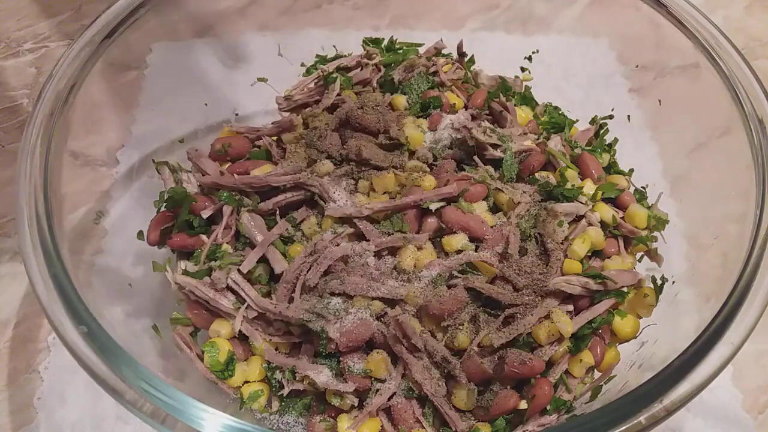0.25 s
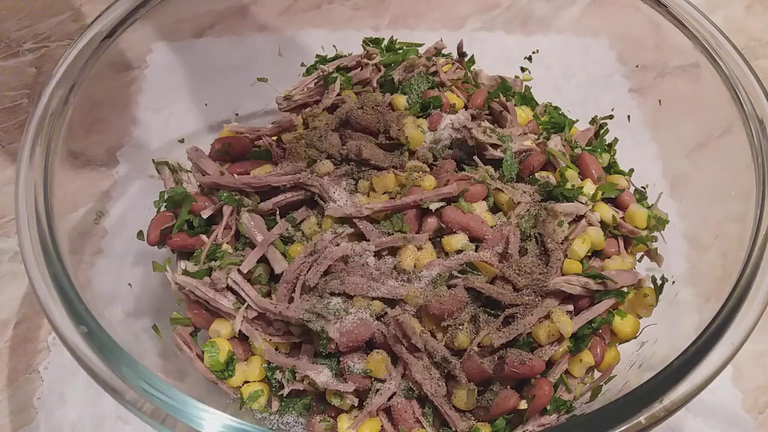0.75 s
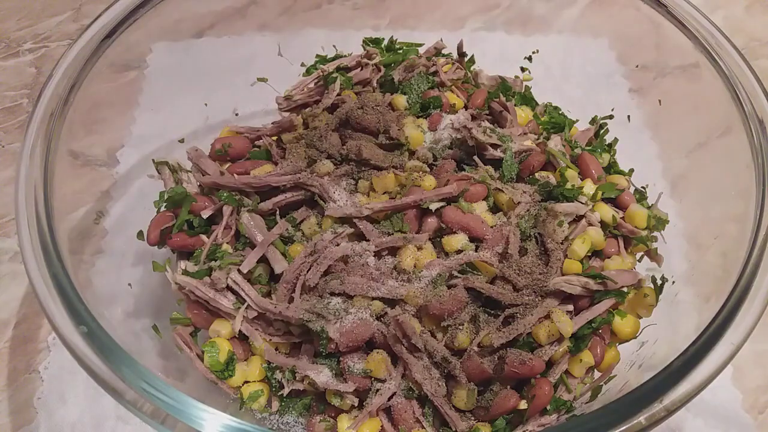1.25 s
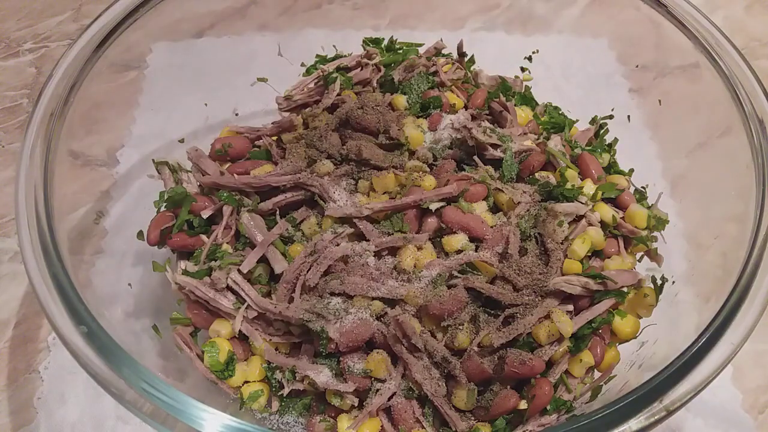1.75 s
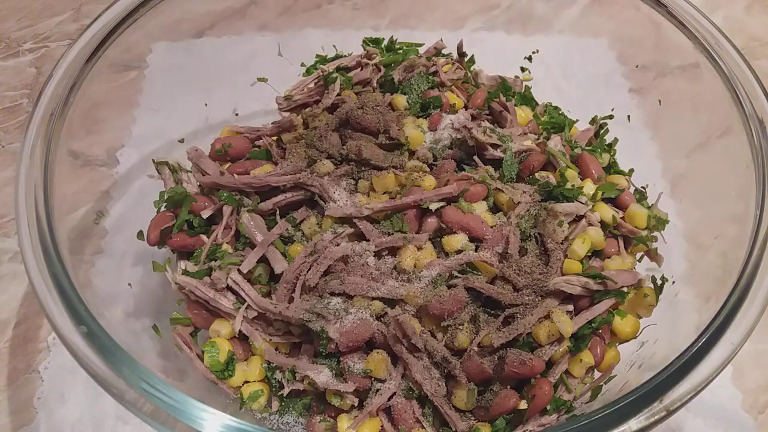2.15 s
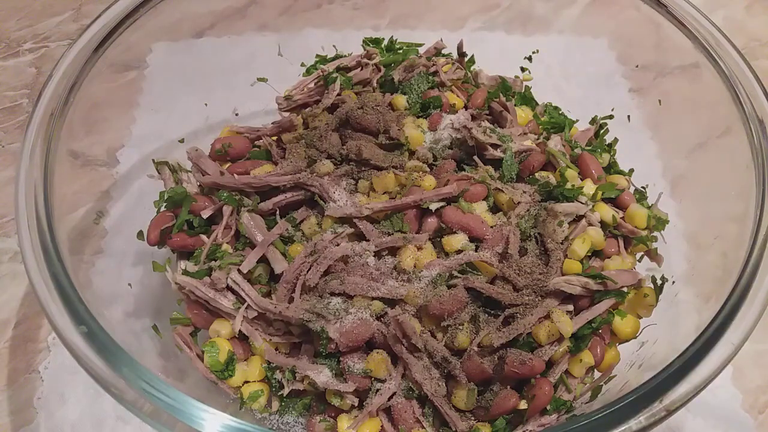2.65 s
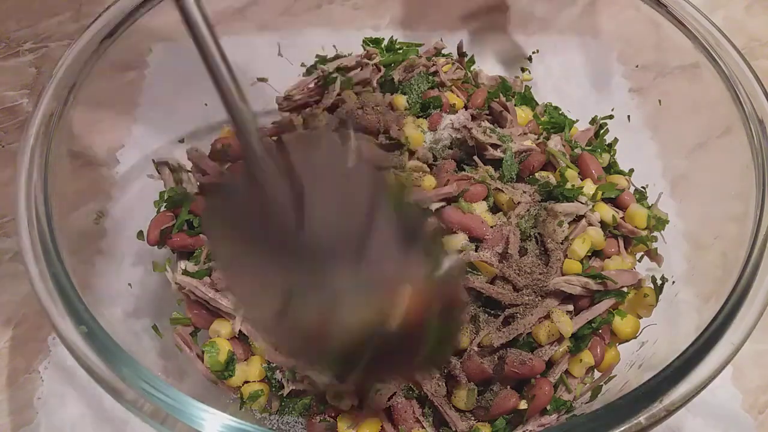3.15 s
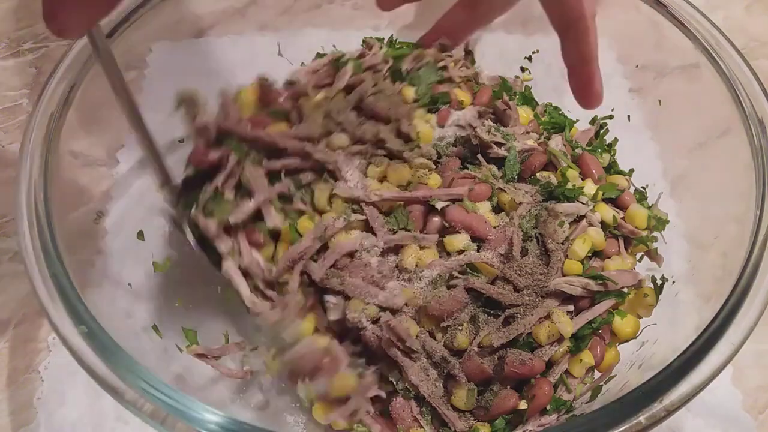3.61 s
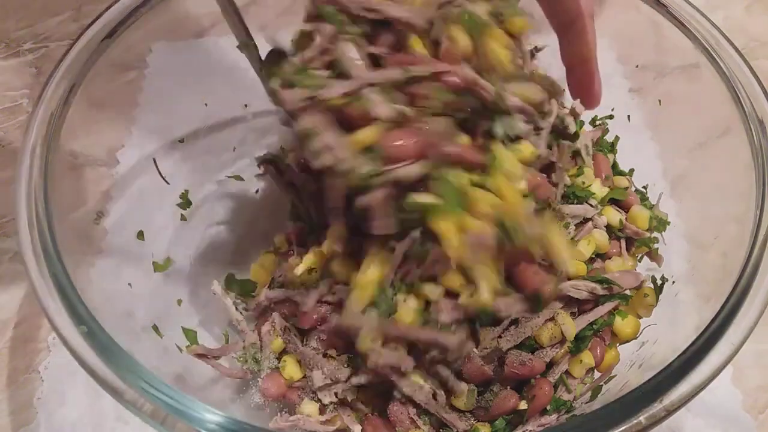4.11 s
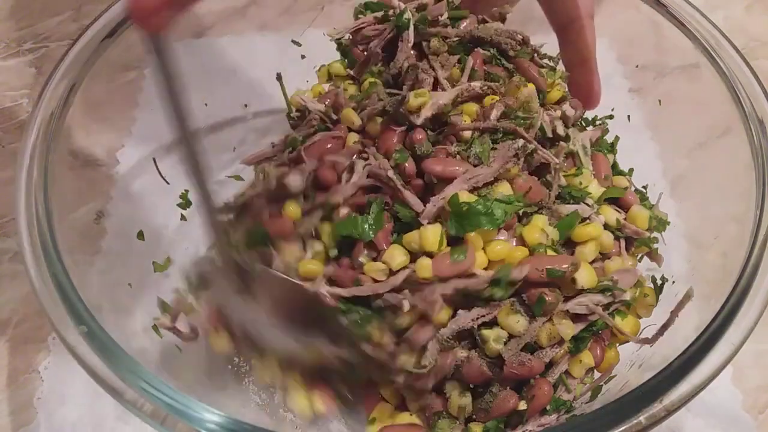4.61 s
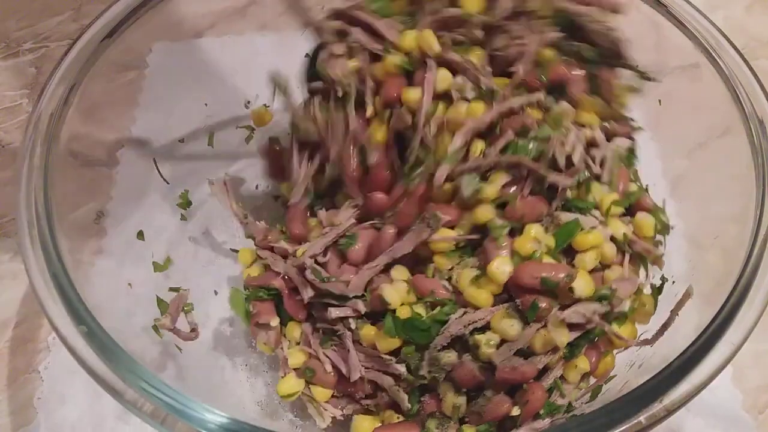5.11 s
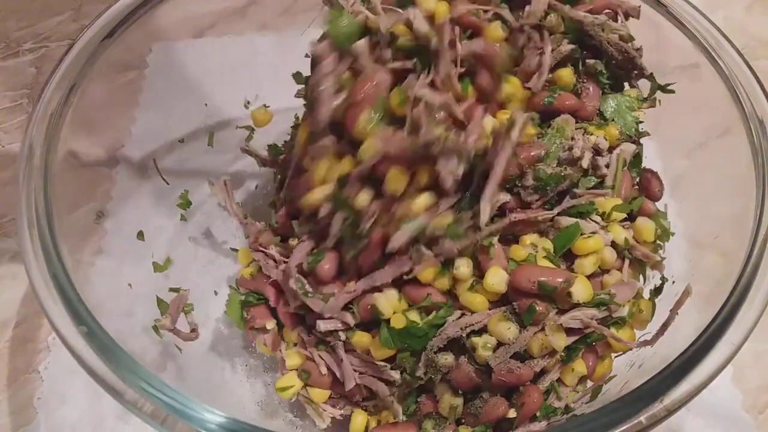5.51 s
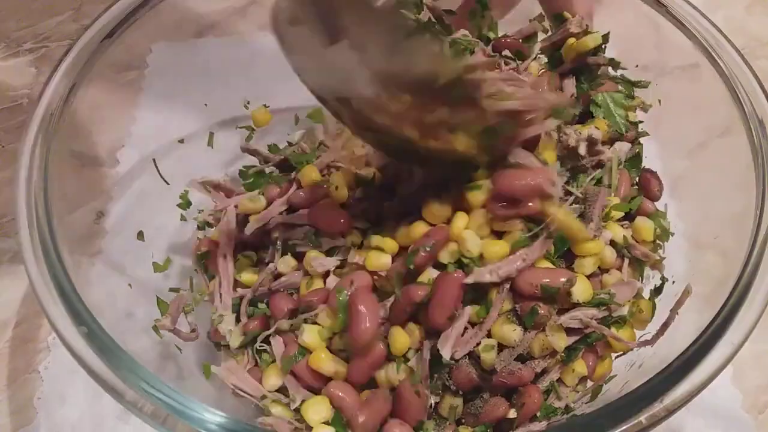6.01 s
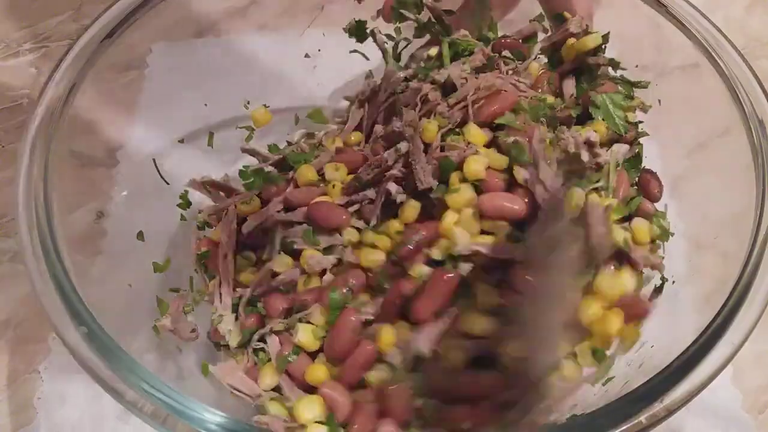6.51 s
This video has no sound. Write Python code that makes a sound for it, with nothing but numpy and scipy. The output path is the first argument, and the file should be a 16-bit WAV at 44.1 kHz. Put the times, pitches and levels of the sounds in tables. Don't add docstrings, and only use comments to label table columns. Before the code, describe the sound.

In a quiet kitchen a lid knocks, cutlery clatters and a cupboard thumps, then a spoon clinks a glass bowl and softly stirs salad.

```python
import sys
import numpy as np
from scipy import signal
from scipy.fft import rfft, irfft, next_fast_len
from scipy.io import wavfile
from scipy.ndimage import uniform_filter1d, map_coordinates

SR = 44100
rng = np.random.default_rng(int(sys.argv[2]) if len(sys.argv) > 2 else 0)


def file_out(sig):
    cols = np.atleast_2d(sig).T
    lim = np.clip(cols, -1, 1)
    pcm = np.round(lim * 32767).astype(np.int16)
    wavfile.write(sys.argv[1], SR, pcm)


def volts(x):
    e = np.asarray(x, float) / 20
    return 10 ** e


N = 298116
TIME = np.arange(N) / SR


def unit(x):
    return x / np.sqrt(np.mean(x ** 2) + 1e-20)


def along(points, hz):
    f, v = np.transpose(points)
    return np.interp(np.log(hz + 1), np.log(f + 1), v)


def wobble(count, size=N):
    knots = rng.standard_normal(size * count // SR + 4)
    return map_coordinates(knots, [TIME[:size] * count])


def swell(s, width, db):
    return db * np.exp(-((TIME - s) / width) ** 2 / 2)


def coloured(x, response):
    return irfft(rfft(x) * response(np.fft.rfftfreq(len(x), 1 / SR)), len(x))


def passed(x, hz, kind):
    return signal.sosfilt(signal.butter(3, min(hz, 20000), kind, fs=SR, output="sos"), x)


def noise(spectrum, count=N):
    m = next_fast_len(count + 8192)
    shape = volts(along(spectrum, np.fft.rfftfreq(m, 1 / SR)))
    return unit(irfft(rfft(rng.standard_normal(m)) * shape, m)[:count])


def patchy(x, depth_db):
    z = signal.stft(x, nperseg=256)[2]
    field = uniform_filter1d(rng.standard_normal(z.shape), size=5, axis=0)
    field = uniform_filter1d(field, size=6, axis=1)
    return unit(signal.istft(z * volts(depth_db * unit(field)), nperseg=256)[1][:len(x)])


def add(track, s, sound):
    part = track[round(s * SR):][:len(sound)]
    part += sound[:len(part)]


# (time nearest [s], audible either side [s], rise of the rumble [dB])
PASSES = [
    (1.48, .3, 8),
    (2.6, .1, 2),
    (5.3, .4, 1.5),
]


def passing_db():
    return sum(swell(*row) for row in PASSES)


# (frequency [Hz], density [dB per Hz])
TRAFFIC_COLOUR = [(15, -54), (25, -24), (33, -27), (45, -14), (57, -7), (86, -3), (150, -1), (200, -8),
                  (260, -38), (440, -120)]


def traffic():
    return volts(-67.5 + passing_db() + .8 * wobble(count=7)) * noise(TRAFFIC_COLOUR)


# (frequency [Hz], density [dB per Hz])
HUM_COLOUR = [(120, -30), (180, -4), (220, -1), (330, -2), (420, -6), (580, -30)]
# (frequency [Hz], width [Hz], level [dB])
ROOM_TONES = [(56, 8, -2), (100, 12, -3), (146, 12, -3), (215, 14, 0), (320, 25, -3)]
# (time [s], either side [s], rise of the hum [dB])
ROCKING = (3.75, .3, 3.5)


def room_hum():
    shaken_db = .6 * passing_db()
    hum = volts(-66.5 + shaken_db + swell(*ROCKING) + .8 * wobble(count=12)) * noise(HUM_COLOUR)

    def resonances(f):
        return sum(volts(db) * w / np.hypot(2 * (f - hz), w) ** 2 * w for hz, w, db in ROOM_TONES)

    tones = coloured(rng.standard_normal(N), resonances)
    return hum + volts(-72 + shaken_db) * unit(tones)


# (frequency [Hz], density [dB per Hz])
AIR_COLOUR = [(300, -30), (480, -1), (1000, -3), (2000, -10.5), (2800, -13), (4200, -32)]
HISS_COLOUR = [(1900, -30), (3200, -1), (4900, -6.5), (6000, -15.5), (7200, -17), (8000, -11), (8800, -12),
               (12000, -5), (14500, -3.5), (15800, -6)]


def air_and_hiss():
    return volts(-69.6 + .8 * wobble(count=9)) * noise(AIR_COLOUR) + volts(-78.2) * noise(HISS_COLOUR)


# (frequency [Hz], t60 [s])
KITCHEN = [(200, .3), (2000, .25), (8000, .18), (15000, .12)]


def kitchen(x):
    hz, t, z = signal.stft(rng.standard_normal(SR // 2), SR, nperseg=256)
    decay = volts(-60 * t / along(KITCHEN, hz)[:, None])
    tail = signal.istft(z * decay, SR, nperseg=256)[1]
    return signal.fftconvolve(np.pad(x, (200, 0)), tail / np.linalg.norm(tail))[:N]


def ring(modes, longest, held=0):
    t = TIME[:SR // 3]
    out = np.zeros(len(t))
    for hz, db, t60 in modes:
        decay_db = -60 * np.maximum(t - held, 0) / min(t60, longest)
        out += volts(db + decay_db) * np.sin(2 * np.pi * hz * t)
    return out


# (time [s], length [s], level [dB], mode [Hz], second mode [Hz])
SLIDES = [(1.2, .45, -67.5, 1080, 1400), (3.497, .012, -58, 9660, 8500), (4.96, .09, -72, 2500, 2900),
          (4.28, .08, -74, 10200, 8400), (4.58, .06, -72, 8800, 13500), (4.76, .08, -72, 8400, 3600),
          (4.82, .05, -73, 3600, 4700), (4.9, .04, -76, 8600, 8300), (5.0, .05, -73, 2700, 9700),
          (5.2, .03, -73, 3900, 9000), (3.78, .1, -72, 10100, 8500), (6.5, .26, -74, 750, 1200),
          (1.92, .03, -66, 1400, 2500), (5.17, .05, -72, 7300, 3600), (5.93, .02, -71, 8900, 10200),
          (5.98, .06, -70, 8400, 11700), (6.56, .03, -75, 8800, 10200), (6.64, .05, -75, 11700, 8400)]


def slides():
    out, t = np.zeros(N), TIME[:SR // 2]
    for s, length, db, hz, second_hz in SLIDES:
        drag = np.sin(np.pi * np.clip(t / length, 0, 1)) * rng.standard_normal(len(t))
        modes = ring([(hz, 0, .03), (second_hz, -3, .03)], longest=1)
        song = signal.fftconvolve(drag, modes[:len(t)])
        add(out, s, volts(db - 5) * song / np.sqrt(np.sum(song ** 2) / (length * SR)))
    return out


def taps(rows, cycles, spread, edge, trim_db):
    out, t = np.zeros(N), TIME[:SR // 20]
    for s, db, hz in rows:
        near = hz * np.exp(spread * np.append(0, rng.standard_normal(2)))[:, None]
        tones = np.mean(np.sin(2 * np.pi * near * t), axis=0)
        tones *= volts(-60 * t * hz / (2 * cycles)) * (1 - np.exp(-1.5 * t * hz))
        scratch = edge * volts(-60 * t / .004) * rng.standard_normal(len(t))
        add(out, s, volts(db + trim_db) * (tones + scratch))
    return out


# (time [s], peak [dB], pitch [Hz])
SNAPS = [(1.3219, -59, 4660), (1.8088, -47, 9040), (3.4174, -44, 10200), (3.4805, -43, 11100),
         (3.4984, -43, 9660), (3.6132, -44, 11800), (3.6706, -36, 10200), (3.6925, -44, 13500),
         (3.6474, -47, 9000), (3.6135, -49, 9000), (3.7115, -45, 11600), (3.8207, -53, 10100),
         (3.8541, -56, 11000), (3.9105, -55, 9500), (4.124, -58, 11000), (4.5804, -57, 8730),
         (4.9437, -55, 5000), (5.1756, -53, 9500), (5.1935, -55, 4500), (5.1935, -57, 12500),
         (5.9329, -57, 8760), (6.434, -60, 8800), (6.578, -58, 8800), (3.8541, -53, 4620),
         (3.9105, -48, 12900), (4.6399, -56, 8540), (4.8144, -59, 4740), (4.9437, -48, 8080),
         (5.1756, -52, 7260), (5.1944, -54, 9070), (5.8764, -62, 7870), (6.0636, -52, 8320),
         (6.1005, -54, 11300), (6.1944, -60, 8980), (6.7164, -60, 8190)]
# (time [s], peak [dB], pitch
# [Hz])
THUDS = [(1.74, -45, 145), (2.056, -42, 155), (2.55, -46, 150), (2.333, -52, 210), (2.741, -55, 250),
         (2.799, -52, 299), (3.499, -50, 330), (3.764, -50, 283), (3.829, -49, 500), (3.93, -50, 330),
         (3.956, -52, 345), (4.09, -44, 310), (4.105, -51, 500), (4.348, -51, 358), (5.237, -46, 600),
         (5.249, -46, 420), (5.679, -49, 237), (5.894, -49, 500)]
# (time [s], peak [dB], pitch [Hz])
TICKS = [(1.8091, -53, 2200), (1.9113, -52, 1480), (1.917, -50, 1400), (1.9255, -50, 1350),
         (1.934, -55, 2500), (3.2575, -54, 2200), (3.2655, -55, 3900), (3.4304, -50, 2500),
         (3.4988, -42, 2250), (3.5418, -55, 2670), (3.6002, -44, 2420), (3.6471, -45, 1570),
         (3.6591, -36, 1580), (3.6714, -39, 1690), (3.6474, -46, 2700), (3.6592, -44, 2800),
         (3.6714, -42, 2700), (3.829, -59, 1000), (4.1215, -60, 2030), (4.988, -58, 2600),
         (5.058, -59, 3600), (4.9694, -58, 2590), (5.0294, -59, 1610), (5.1108, -57, 2500),
         (5.249, -54, 1100), (6.6927, -56, 3160)]


def small_contacts():
    small = taps(SNAPS, cycles=22.5, spread=.2, edge=.22, trim_db=3)
    small = small + taps(THUDS, cycles=8.5, spread=.35, edge=.015, trim_db=1.5)
    small = small + taps(TICKS, cycles=12.5, spread=.08, edge=.07, trim_db=2.5)
    return passed(small, 70, "high")


def blow(row, onset, modes, colour, refeed):
    s, clatter_db, crack_db, held, t60, ring_db, longest = row
    treble_hz, build, crack_hz, bend = onset
    t, out = TIME[:SR // 3], np.zeros(N)
    shape = volts(-60 * (np.maximum(t - held, 0) / t60) ** bend)
    lumps = volts(1.3 * wobble(count=500, size=len(t)))
    clatter = volts(clatter_db) * shape * lumps * patchy(noise(colour, count=len(t)), depth_db=2.5)
    crack = unit(passed(noise(colour, count=len(t)), crack_hz, "low"))
    crack *= volts(crack_db - 9 - 60 * t / .004)
    rebounds = rng.standard_normal(len(t)) * lumps * (t < held)
    rebounds = refeed * rebounds / np.linalg.norm(rebounds) + (t == 0)
    ringing = signal.fftconvolve(rebounds, ring(modes, longest, held))[:len(t)]
    contact = 1 - np.exp(-t / .00007)
    body = contact * clatter + volts(ring_db) * ringing
    low = coloured(body, lambda hz: 1 / (1 + (hz / treble_hz) ** 8))
    asleep = np.exp(-(t / build) ** 2)
    add(out, s, body - asleep * (body - low) + contact * crack)
    return out


# (frequency [Hz], density [dB per Hz])
LID_BLOW = (1.6976, -40, -22, .012, .165, -51, .13)
LID_ONSET = (5600, .005, 5000, 1.05)
LID_MODES = [(599, -3, .1), (793, -2, .12), (2041, -5, .1), (2775, -5, .12), (3262, -4, 0.21),
             (4533, -19, 0.6), (4888, -16, 0.21), (7241, -4, 0.092), (8360, -10, 0.28), (9808, -17, 0.16),
             (10420, -3, 0.11), (11310, -9, 0.095), (12680, -26, 0.11), (14330, -19, 0.15)]
LID_COLOUR = [(120, -16), (400, -11), (650, -1), (850, -2), (1300, -12), (2000, -4), (3200, -4),
              (4100, -10), (5000, -6), (5600, -13), (8500, -11), (9100, -20), (10400, -9), (11500, -12),
              (12900, -22), (13600, -30)]


def knocked_lid():
    return blow(LID_BLOW, LID_ONSET, LID_MODES, LID_COLOUR, refeed=1.5)


# (time [s], peak [dB], pitch [Hz])
FAR_CHIPS = [(1.6977, -32, 2300), (1.6985, -34, 3700), (1.699, -42, 10400), (1.7075, -40, 7240),
             (1.709, -42, 2800), (1.7095, -44, 11300), (1.7125, -42, 8400), (2.0514, -21, 3600),
             (2.0535, -26, 3700), (2.0535, -30, 9800), (2.0615, -29, 4700), (2.078, -29, 4700),
             (2.0895, -26, 4700), (2.091, -30, 9900), (2.0985, -29, 5000), (2.1245, -35, 8200),
             (2.567, -50, 3700), (2.586, -48, 3700)]
# (time [s], peak [dB], pitch [Hz])
FAR_KNOCKS = [
    (1.6977, -36, 680),
    (2.0518, -29, 1300),
    (2.0525, -33, 500),
    (2.5463, -33, 850),
    (2.5555, -41, 1100),
    (2.568, -37, 480),
    (2.5875, -40, 700),
]


def far_contacts():
    chips = taps(FAR_CHIPS, cycles=14, spread=.04, edge=.01, trim_db=.1)
    return chips + taps(FAR_KNOCKS, cycles=4.5, spread=.1, edge=.001, trim_db=3)


# (time of firmest contact [s], build-up [s], let-
# go [s], rustle [dB], drag over rustle [dB])
STROKES = [(1.762, .005, .06, -62, 3), (1.808, .02, .04, -59, 2), (1.922, .012, .06, -60, 2),
           (2.726, .04, .05, -74, 2), (3.265, .06, .08, -68, 8), (3.3, .03, .04, -65, 5),
           (3.43, .005, .035, -56, 2), (3.504, .07, .012, -57, -1), (3.676, .07, .05, -53, -4),
           (3.545, .05, .07, -66, -1), (3.8, .12, .2, -69, -5), (4.324, .12, .1, -73, -3),
           (4.588, .03, .14, -72, -9), (4.782, .12, .16, -69, -2), (4.95, .1, .1, -68, 0),
           (5.03, .05, .07, -68, 0), (5.188, .07, .09, -67, -3), (5.558, .05, .05, -74, -4),
           (5.65, .02, .1, -78, 0), (5.88, .03, .15, -78, -1), (5.99, .03, .15, -72, -9),
           (6.19, .03, .05, -75, -6), (6.438, .02, .05, -77, 2), (6.718, .25, .07, -74, 0)]
# (frequency [Hz], density [dB per Hz])
RUSTLE_COLOUR = [(3000, -28), (4500, -9), (6500, -9), (8500, -1), (12000, -4), (15800, -6)]
DRAG_COLOUR = [(700, -30), (1200, -8), (1600, -2), (2500, -2), (4000, -4), (6000, -11), (8500, -30)]


def rubbing():
    bright, dull = np.zeros(N), np.zeros(N)
    for s, build, release, db, drag_db in STROKES:
        pressure = volts(db - 12 * np.maximum((s - TIME) / build, (TIME - s) / release))
        bright = np.hypot(bright, pressure)
        dull = np.hypot(dull, volts(drag_db - 1.5) * pressure)
    clumps = 1.2 * wobble(count=80)
    bright *= unit(volts(clumps + 3 * wobble(count=450)))
    dull *= unit(volts(clumps + 3 * wobble(count=250)))
    return bright * patchy(noise(RUSTLE_COLOUR), depth_db=3.5) + dull * patchy(noise(DRAG_COLOUR), depth_db=4)


CUTLERY_BLOW = (2.0513, -35.3, -18, .05, .185, -40.5, .22)
CUTLERY_ONSET = (5600, .006, 5500, 1.3)
CUTLERY_MODES = [(529, -15, 0.3), (2319, -2.5, 0.2), (3532, 0, 0.3), (3673, -7, 0.23), (3770, -10, 0.3),
                 (3841, -14, 0.3), (4355, -11, 0.27), (4588, -8, 0.21), (4671, 2, 0.17), (4822, -11, 0.19),
                 (4922, -7, 0.2), (5083, -11, 0.26), (5615, -18, 0.3), (6444, -14, 0.21), (6592, -12, 0.24),
                 (7063, -15, 0.3), (8096, -7, 0.3), (8205, -12, 0.14), (8285, -8, 0.23), (9195, -13, 0.3),
                 (9806, -7, 0.22), (9946, -6, 0.21), (10480, -13, 0.21), (11293, -25, 0.3),
                 (11378, -14, 0.16), (11773, -21, 0.3), (11970, -2, 0.2), (12059, -18, 0.29),
                 (12318, -13, 0.18), (14804, -20, 0.3)]
CUTLERY_COLOUR = [(80, -30), (170, -4), (380, 0), (1400, -6), (3000, -7), (3650, -1), (4100, -5), (4800, 3),
                  (5500, -5), (7200, -8), (7650, -34), (8100, -9), (10400, -10), (10900, -45), (11600, -6)]


def clattering_cutlery():
    return blow(CUTLERY_BLOW, CUTLERY_ONSET, CUTLERY_MODES, CUTLERY_COLOUR, refeed=.9)


FRONT_BLOW = (2.5463, -44.5, -27, .036, .145, -53.5, .12)
FRONT_ONSET = (1800, .008, 1200, 1.2)
FRONT_MODES = [(209, -8, 0.22), (311, -6, 0.15), (528, 0, 0.21), (678, -8, 0.18), (805, -3, 0.2),
               (1114, -1, 0.14), (1309, -7, 0.17), (1451, -10, 0.22), (2013, -16, 0.21), (3025, -19, 0.22),
               (3762, -14, 0.19), (4565, -16, 0.22), (4986, -21, 0.22), (6479, -23, 0.22)]
FRONT_COLOUR = [(90, -35), (170, -4), (530, -3), (800, -6), (1440, -6), (1600, -17), (3750, -16),
                (4200, -27), (4900, -17), (5400, -38), (6500, -33), (9000, -37), (15800, -50)]


def shut_front():
    return blow(FRONT_BLOW, FRONT_ONSET, FRONT_MODES, FRONT_COLOUR, refeed=.8)


BOWL_BLOW = (3.3604, -29, -14, .003, .034, -40.5, .45)
BOWL_ONSET = (6500, .0003, 15000, 1.05)
BOWL_MODES = [(414, -6, .27), (1094, -18, .42), (2038, -10, .42), (3195, -1, .16), (4587, -15, .18),
              (5775, -11, .14), (6132, -8, .16), (7095, -15, .15), (7226, -5, .15), (7337, -11, .18),
              (7642, -6, .08), (8496, -10, .17), (8827, -12, .13), (9174, -9, .12), (10223, -6, .15),
              (10990, -10, .1), (11487, -20, .25), (12071, -9, .16), (12188, -8, .14), (12291, -10, .16)]
BOWL_COLOUR = [(150, -35), (400, -8), (900, -18), (2000, -15), (3300, -6), (6100, -6), (6700, -35),
               (7200, -3), (10200, -1), (12500, 1.5), (13900, -18), (15200, -4), (15800, -12)]
# (time [s], peak [dB], pitch [Hz])
BOWL_CHIPS = [(3.3604, -18, 9600), (3.3605, -19, 14700), (3.3625, -22, 12600), (3.3617, -17, 10200),
              (3.3626, -17, 10700), (3.3635, -19, 9200), (3.3655, -25, 7600), (3.3715, -31, 10000),
              (3.394, -38, 7300), (3.4175, -42, 11500)]
# (time [s], peak [dB], pitch [Hz])
BOWL_KNOCKS = [
    (3.3604, -14, 3800),
    (3.3606, -16, 5600),
    (3.362, -23, 3700),
]


def bowl_clink():
    bowl = blow(BOWL_BLOW, BOWL_ONSET, BOWL_MODES, BOWL_COLOUR, refeed=.1)
    bowl = bowl + taps(BOWL_CHIPS, cycles=20, spread=.04, edge=.05, trim_db=.1)
    bowl = bowl + taps(BOWL_KNOCKS, cycles=4.5, spread=.06, edge=.05, trim_db=2.5)
    return passed(bowl, 210, "high")


# (frequency [Hz], gain [dB])
EARLY_FAR = [(300, -2), (700, -3), (1500, 3), (2300, -3), (2800, 2), (3600, -9), (4200, -5), (4800, 0),
             (5800, -8), (12000, -10)]
EARLY_BOWL = [(300, 0), (2500, 4), (3200, 2), (3900, -8), (4900, 3), (6600, -8), (7500, 3), (10000, -14)]


def early_copies(far, bowl):
    early = volts(-20.5) * coloured(far, lambda hz: volts(along(EARLY_FAR, hz)))
    early = early + volts(-25) * coloured(bowl, lambda hz: volts(along(EARLY_BOWL, hz)))
    return np.roll(early, -round(.0657 * SR))


def scene():
    background = traffic() + room_hum() + air_and_hiss()
    small = small_contacts()
    far = knocked_lid() + far_contacts() + clattering_cutlery() + shut_front()
    far = passed(far, 70, "high")
    bowl = bowl_clink()
    direct = small + far + bowl + rubbing() + slides()
    room = volts(-12) * kitchen(small) + volts(-16) * kitchen(far) + volts(-10) * kitchen(bowl)
    return (background + direct + room + early_copies(far, bowl))[None]


def low_pass(x):
    return signal.sosfilt(signal.butter(12, 16640, fs=SR, output="sos"), x)


# (start [s], end [s])
BLINK = (3.3478, 3.3535)


def record(dry):
    blink = np.clip(np.maximum(BLINK[0] - TIME, TIME - BLINK[1]) * 1000, 0, 1)
    band = irfft(rfft(dry * blink) * (np.fft.rfftfreq(N, 1 / SR) < 15790), N)
    return low_pass(band - .0007)


dry = scene()
out = record(dry)
file_out(out)
```